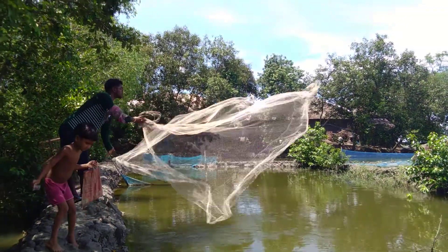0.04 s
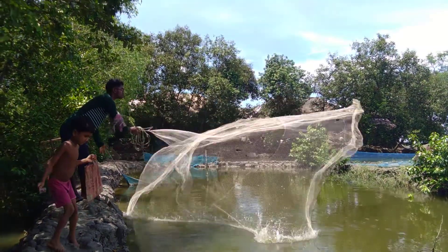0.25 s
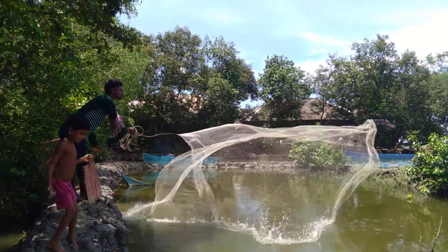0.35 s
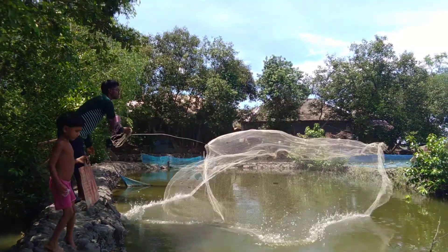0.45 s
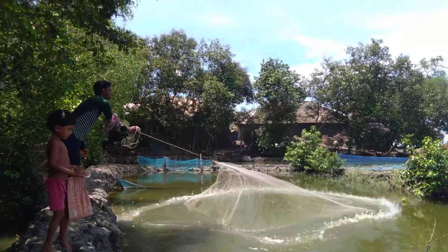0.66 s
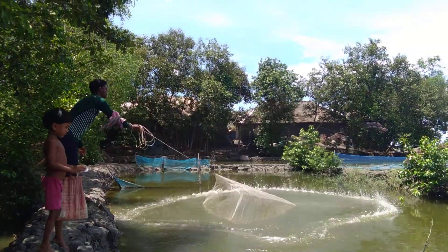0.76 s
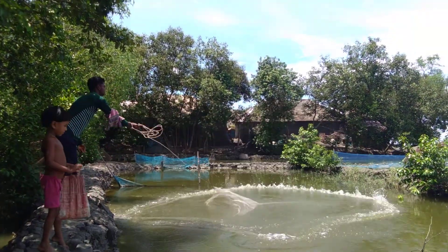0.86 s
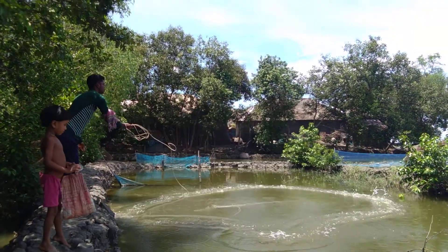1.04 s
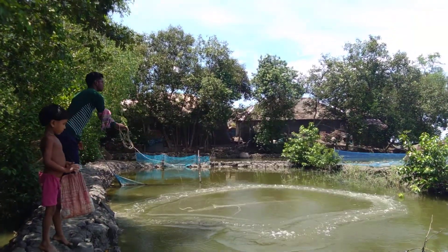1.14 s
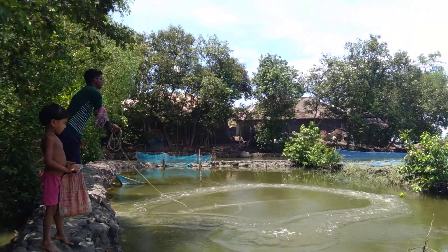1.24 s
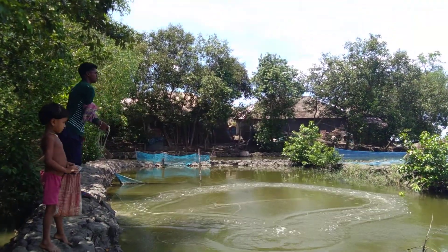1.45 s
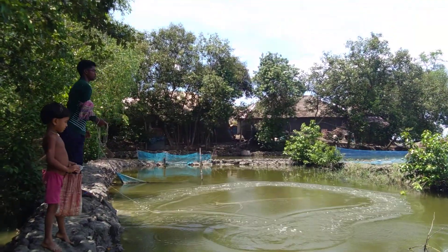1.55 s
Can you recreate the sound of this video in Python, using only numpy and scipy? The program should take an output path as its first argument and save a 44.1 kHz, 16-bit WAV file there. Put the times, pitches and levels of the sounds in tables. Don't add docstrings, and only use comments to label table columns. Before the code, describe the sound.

After a brief faint swish, a thrown net splashes broadly on a pond, with misty spray, hollow plops and bubbly froth thinning to quiet; tiny distant bird chirps and a soft knock near the phone microphone outdoors.

```python
import sys
import numpy as np
from scipy import signal
from scipy.fft import rfft, irfft, next_fast_len
from scipy.io import wavfile
from scipy.ndimage import uniform_filter1d, map_coordinates

SR = 44100
rng = np.random.default_rng(int(sys.argv[2]) if len(sys.argv) > 2 else 0)


def waveform_to_disk(signal):
    frames = np.transpose(np.atleast_2d(signal))
    scaled = np.clip(frames, -1, 1) * 32767
    samples = np.round(scaled).astype(np.int16)
    wavfile.write(sys.argv[1], SR, samples)


def volts_from_decibels(level):
    exponent = np.asarray(level, float) / 20
    return 10 ** exponent


N = 70560

# (time [s], spray level [dB], trapped air over spray [dB])
LANDING = [(.204, -77, -43), (.208, -41, -56), (0.263, -37.5, -36), (.3, -41.5, 1.5), (0.328, -39.5, -1.5),
           (.385, -43.5, -3), (.44, -42, -3), (.6, -41.5, -6.5), (.66, -42, -2), (.76, -40, -1),
           (.81, -40.5, 0), (.84, -49, 4), (.9, -49.5, -6.5), (1.0, -46.5, -1.5), (1.07, -47.5, -6),
           (1.3, -61, -3.5), (1.6, -69, -23)]
# (time [s], level [dB], length [s], fine mist over sheet [dB])
SHEETS = [
    (0.211, -39, 0.0041, 0),
    (0.254, -32.5, 0.0057, 5.5),
    (.308, -35.5, 0.013, -5),
    (0.474, -44, .008, 0),
    (0.531, -52, .01, 8),
    (0.674, -38.5, 0.0096, -5),
    (0.723, -38, 0.02, 5),
    (0.936, -43, .006, -3),
    (1.048, -52, 0.02, 2),
    (1.195, -57.5, .003, -1),
]
# (time [s], peak level [dB], cavity pitch [Hz], ring [cycles])
PLOPS = [(.281, -36.5, 810, 7.1), (.296, -38, 1480, 5.5), (.303, -20, 864, 3), (.304, -29, 2370, 13),
         (.31, -25.5, 2480, 8.5), (.317, -27, 755, 5), (.318, -31.5, 331, 3.6), (.338, -37.5, 337, 5.4),
         (.353, -28, 1180, 6.8), (.411, -30, 1300, 5.1), (.532, -35, 2470, 21), (0.434, -27.5, 1330, 6.2),
         (0.481, -29.5, 1690, 8.5), (.587, -36, 1460, 12), (.693, -31, 2000, 6.7), (.66, -27, 902, 9.6),
         (.682, -27.5, 960, 7.8), (.725, -27, 947, 9.3), (.741, -26, 860, 2.7), (.77, -35, 486, 3.5),
         (.796, -24, 635, 3), (.865, -37.5, 468, 10.8), (0.892, -38, 1387, 18), (.852, -43.5, 650, 8),
         (0.916, -34.5, 1200, 7.5), (0.972, -36, 2400, 6), (1.04, -37, 1770, 13), (1.192, -41.5, 2580, 6.2),
         (1.17, -47.5, 840, 6.3), (1.448, -50, 1520, 6.4)]
# (time [s], length [s], start pitch [Hz], end pitch [Hz], level [dB])
BIRDS = [
    (.08, .045, 5650, 4650, -67),
    (.125, .065, 5600, 5400, -69),
    (.135, .03, 4000, 3600, -71),
    (1.49, .012, 5450, 5550, -66),
    (1.53, .025, 3400, 3750, -67),
    (1.545, .028, 5200, 4600, -70),
    (1.571, .035, 3970, 3970, -61),
]
# (time [s], level [dB], pitch [Hz])
KNOCK = (1.383, -43.5, 105)
# (frequency [Hz], level [dB])
LEAF_SPECTRUM = [(200, -1), (480, -5), (1100, -9), (1900, -12), (2700, -7.5), (4300, -15.5), (5700, -6.5),
                 (8500, -24), (15400, -49)]
RUMBLE_SPECTRUM = [(20, -45), (35, -21), (60, 1.5), (115, 5.5), (165, 0.5), (230, -9.5)]
# (frequency [Hz], level [dB])
SWISH_SPECTRUM = [(200, -16), (2000, -9.5), (4500, -11), (5800, 3), (7000, -4), (9000, -16), (16000, -23)]
# (frequency [Hz], level [dB])
SPRAY_SPECTRUM = [(700, -47), (1600, -39), (2200, -5), (4000, 4.5), (7000, 3.5), (10000, -13), (16000, -6)]
MIST_SPECTRUM = [(5000, -26), (8000, -7), (11000, -4.5), (16000, -1)]
GURGLE_SPECTRUM = [(150, -37), (300, -13.5), (500, -3), (900, 1.5), (1300, -6), (2200, -15.5), (5000, -76)]
FROTH_SPECTRUM = [(500, -44), (900, -4), (1200, 1.5), (1800, -0.5), (2600, -2), (4000, -6.5), (8000, -50)]
# (frequency [Hz], gain [dB])
MIC = [(200, -3), (3000, -0.5), (6500, -3.5), (8200, -11.5), (10000, -16.5), (12200, -25.5), (14500, -22),
       (16000, -24)]
LOW_CUT = [(15, -30), (32, -10), (50, 0)]
# (centre [Hz], width [Hz], gain [dB])
RESONANCES = [(2553, 670, 6.5), (5980, 1700, 4), (1019, 72, -11), (4044, 830, -7.5), (3000, 260, -2.5),
              (3580, 170, 2.5)]

TIME = np.arange(N) / SR
SURGE_DB = 1.2


def unit(x):
    return x / np.sqrt(np.mean(x ** 2) + 1e-20)


def along(points, hz):
    f, v = np.transpose(points)
    return np.interp(np.log(hz + 1), np.log(f + 1), v)


def wobble(rate):
    knots = rng.standard_normal(int(N * rate / SR) + 4)
    return map_coordinates(knots, [np.arange(N) * rate / SR])


def filtered(x, gain_db):
    m = next_fast_len(N + 8192)
    return irfft(rfft(x, m) * volts_from_decibels(gain_db(np.fft.rfftfreq(m, 1 / SR))), m)[..., :N]


def rush(spectrum, patchy_db):
    z = signal.stft(rng.standard_normal(N), nperseg=256)[2]
    field = uniform_filter1d(rng.standard_normal(z.shape), size=4, axis=0)
    field = uniform_filter1d(field, size=6, axis=1)
    x = signal.istft(z * volts_from_decibels(patchy_db * unit(field)), nperseg=256)[1][:N]
    return unit(filtered(x, lambda hz: along(spectrum, hz)))


def bubbles(s, gain, hz, cycles, rise, size):
    t = np.arange(size) / SR
    u = t * (hz / cycles)[:, None]
    envelope = gain[:, None] * 2 * (1 - np.exp(-6 * u)) * np.exp(-2.5 * u)
    x = envelope * np.sin(2 * np.pi * hz[:, None] * t * (1 + rise * np.minimum(u, 2) / 2))
    at = np.round(s * SR).astype(int)[:, None] + np.arange(size)
    return np.bincount(at.ravel(), x.ravel(), N + size)[:N]


def swarm(hz, spread, cycles, size_db, rise, spectrum, count, size):
    u, g = rng.random((count, 2)), rng.standard_normal((count, 2))
    pitch = np.clip(hz * np.exp(spread * g[:, 0]), 250, 15000)
    gain = volts_from_decibels(np.minimum(-size_db * np.log(1 - u[:, 1]), 10))
    ring = cycles * np.exp(0.36 * g[:, 1])
    x = bubbles(u[:, 0] * N / SR, gain, pitch, ring, rise, size)
    return unit(filtered(x, lambda f: 0.92 * along(spectrum, f)))


def blend(a, b, share):
    share = np.clip(share, 0, 1)
    return np.sqrt(1 - share) * a + np.sqrt(share) * b


def leaves():
    return volts_from_decibels(-61) * rush(LEAF_SPECTRUM, patchy_db=-0.5)


def rumble():
    spectrum = [(12, -60)] + list(RUMBLE_SPECTRUM) + [(330, -40.5)]
    return volts_from_decibels(-60.5 + 0.92 * wobble(9.1)) * rush(spectrum, patchy_db=0.5)


def swish():
    level_db, t60_s = -50, 0.13
    return volts_from_decibels(level_db - 60 * TIME / t60_s) * rush(SWISH_SPECTRUM, patchy_db=-0.5)


def birds():
    out = 0
    for s, life, start_hz, end_hz, db in BIRDS:
        u = np.clip((TIME - s) / life, 0, 1)
        envelope = volts_from_decibels(db - 9 * u) * np.sqrt(abs(np.sin(np.pi * u)))
        cycles = np.cumsum(start_hz + (end_hz - start_hz) * u) / SR
        out = out + envelope * np.sin(2 * np.pi * cycles)
    return out * volts_from_decibels(2.5 * wobble(150))


def spray(level, mist_level):
    drops = swarm(4280, spread=0.52, cycles=2.34, size_db=4.5, rise=0.038, spectrum=SPRAY_SPECTRUM,
                  count=9000, size=160)
    droplets = blend(rush(SPRAY_SPECTRUM, patchy_db=-0.5), drops, share=0.3)
    return level * droplets + mist_level * rush(MIST_SPECTRUM, patchy_db=-2.3)


def gurgle(level, spray_db, air_db):
    air = swarm(701.5, spread=0.405, cycles=4.63, size_db=2.5, rise=0.15, spectrum=GURGLE_SPECTRUM,
                count=1100, size=1200)
    strength = np.sqrt(level * volts_from_decibels(spray_db)) * volts_from_decibels(air_db + 2 * SURGE_DB * wobble(29.9))
    return strength * blend(rush(GURGLE_SPECTRUM, patchy_db=0.5), air, share=0.44)


def froth(spray_db, air_db):
    small = swarm(1578, spread=0.373, cycles=3.7, size_db=2.5, rise=0.15, spectrum=FROTH_SPECTRUM,
                  count=2400, size=600)
    follows_air = 0.34
    strength = volts_from_decibels(spray_db + 0.5 + follows_air * air_db + 1.45 * wobble(24.88))
    return strength * blend(rush(FROTH_SPECTRUM, patchy_db=2.2), small, share=0.44)


def plops():
    at, db, hz, cycles = np.transpose(PLOPS)
    return bubbles(at, volts_from_decibels(db), hz, cycles, rise=0.024, size=1800)


def net():
    s, spray_db, air_db = np.transpose(LANDING)
    spray_db = np.interp(TIME, s, spray_db, left=-120)
    air_db = np.interp(TIME, s, air_db)
    bed = volts_from_decibels(spray_db + SURGE_DB * wobble(39.95))
    power, mist_power = bed ** 2, bed ** 2
    for at, db, life, mist_db in SHEETS:
        width = np.where(TIME < at, 0.71 * life, life)
        sheet = volts_from_decibels(db) * np.exp(-0.5 * ((TIME - at) / width) ** 2)
        power = power + sheet ** 2
        mist_power = mist_power + (sheet * volts_from_decibels(mist_db)) ** 2
    level = np.sqrt(power)
    mist_level = volts_from_decibels(-2) * np.sqrt(mist_power)
    air = gurgle(level, spray_db, air_db) + froth(spray_db, air_db)
    return spray(level, mist_level) + air + plops()


def knock():
    s, db, hz = KNOCK
    u = (TIME - s) * hz
    return -volts_from_decibels(db) * np.sin(2 * np.pi * u) * np.exp(-((u - 0.5) / 0.55) ** 2)


def bank(x):
    t60_s, level_db = 0.29, -14.5
    t = np.arange(SR // 4) / SR
    tail = rng.standard_normal(len(t)) * volts_from_decibels(-60 * t / t60_s) * (t > 0.004)
    return x + volts_from_decibels(level_db) * signal.fftconvolve(x, tail / np.linalg.norm(tail))[:N]


def near_response(f):
    peaks = sum(db / (1 + ((f - c) / w * 2) ** 2) for c, w, db in RESONANCES)
    return along(MIC, f) + peaks


def scene():
    near = filtered(bank(net()), near_response)
    far = leaves() + rumble() + swish() + bank(birds()) + knock()
    return (near + far)[None]


def band_limit(x):
    return signal.sosfilt(signal.butter(12, 16070, fs=SR, output="sos"), x)


def record(dry):
    top_hz = 15530
    mix = filtered(dry, lambda f: along(LOW_CUT, f) - 120.0 * (f > top_hz))
    return band_limit(mix)


dry = scene()
out = record(dry)
waveform_to_disk(out)
```